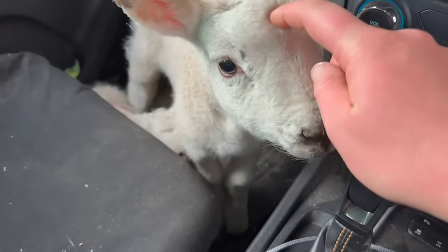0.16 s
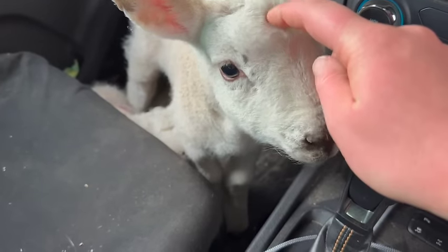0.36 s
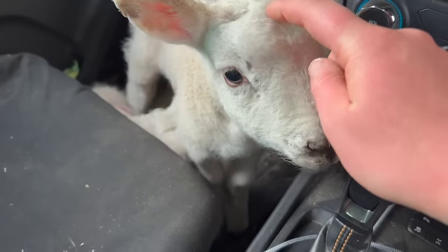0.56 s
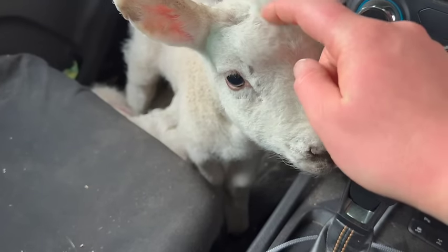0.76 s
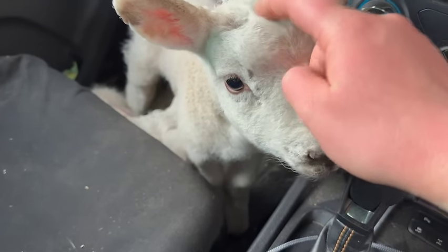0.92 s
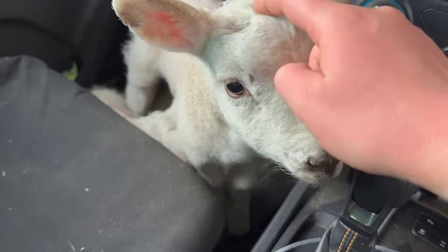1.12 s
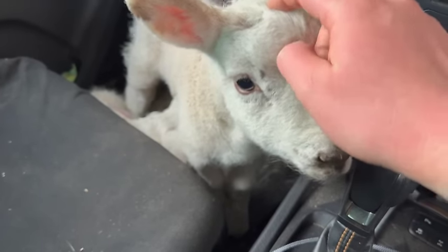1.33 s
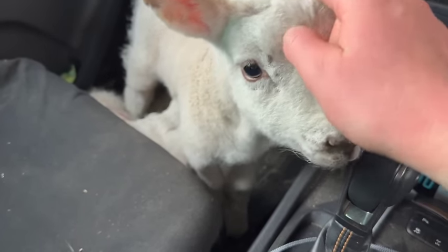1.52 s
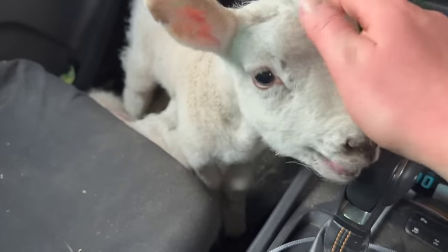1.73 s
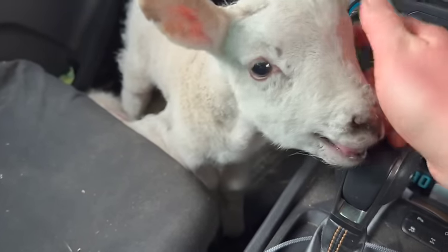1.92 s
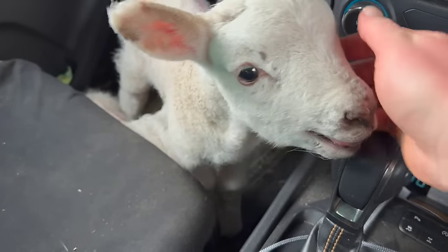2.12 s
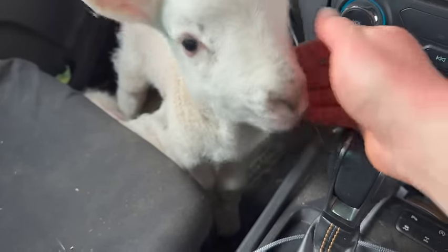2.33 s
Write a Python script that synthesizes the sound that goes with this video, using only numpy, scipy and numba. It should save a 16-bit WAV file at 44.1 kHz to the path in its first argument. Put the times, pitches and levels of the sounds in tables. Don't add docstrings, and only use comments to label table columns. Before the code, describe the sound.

One high lamb bleat dominates the second half, rising quickly, holding, then wavering and fading; before it only soft sniffs, low thumps, faint cab hum and a lip smack, heard close with a short dry echo.

```python
import sys
import numpy as np
from scipy import signal
from scipy.fft import rfft, irfft, next_fast_len
from scipy.io import wavfile
from scipy.ndimage import uniform_filter1d
from numba import njit

SR = 44100
rng = np.random.default_rng(int(sys.argv[2]) if len(sys.argv) > 2 else 0)


def waveform_to_disk(signal):
    frames = np.transpose(np.atleast_2d(signal))
    scaled = np.clip(frames, -1, 1) * 32767
    samples = np.round(scaled).astype(np.int16)
    wavfile.write(sys.argv[1], SR, samples)


def boost(x):
    u = np.asarray(x, float) / 20
    return 10 ** u


N = 104517
T = np.arange(N) / SR
BLEAT_START_S = 1.599


def noise():
    return rng.standard_normal(N)


def level(x, db):
    return x * boost(db) / np.sqrt(np.mean(x ** 2))


def on_log(table, hz):
    a = np.array(table, float)
    return np.interp(np.log(hz + 1), np.log(a[:, 0]), a[:, 1])


@njit
def svf(x, hz, width):
    y, b, l = np.empty(len(x)), 0., 0.
    for i in range(len(x)):
        g, k = np.tan(np.pi * hz[i] / SR), width / hz[i]
        v = (b + g * (x[i] - l)) / (1 + g * (g + k))
        b, l, y[i] = 2 * v - b, l + 2 * g * v, k * v
    return y


def band(x, hz, width):
    return svf(x + 1e-18, hz * np.ones(N), 1. * width)


def steep(x, hz, width):
    return band(band(x, hz, width), hz, width)


def walk(rate_hz):
    k = int(SR / rate_hz)
    held = np.repeat(rng.standard_normal(N // k + 1), k)
    return 1.3 * uniform_filter1d(uniform_filter1d(held, k), k)[:N]


def bump(at_s, length_s):
    return np.exp(-.5 * ((T - at_s) / length_s) ** 2)


def breath():
    # (time [s], level [dB])
    strength = [(0, -61), (.2, -67), (.3, -75), (.4, -89), (.87, -93), (.94, -72.5), (1.1, -84.5),
                (1.27, -71), (1.55, -72)]
    # (centre [Hz], width [Hz], level [dB])
    nose = [(272, 280, 5), (490, 170, -0.5), (1035, 240, 1), (1393, 130, 2), (2450, 340, -2),
            (4960, 990, -8.5), (7360, 980, -7.5), (11000, 5000, -18)]
    dull_after_s, dull_db_per_khz, end_s = 0.47, -0.5, 1.6
    times_s, levels_db = np.array(strength, float).T
    air = noise() * boost(walk(39.6))
    dull_db_per_hz = dull_db_per_khz * (T > dull_after_s) / 1000
    hiss = sum(boost(db + dull_db_per_hz * hz) * steep(air, hz, width * 1.56) for hz, width, db in nose)
    return level(hiss, 0) * boost(np.interp(T, times_s, levels_db)) * (T < end_s)


def cab():
    # (frequency [Hz], density [dB per Hz])
    spectrum = [(15, -42), (25, 0.5), (64, 1.5), (102, -7), (190, -15.5), (229, -12.5), (326, -20.5),
                (911, -31.5), (16000, -54.5)]
    cab_db = -66
    out = 0
    for hz in 30 * 2 ** np.arange(0, 9.1, .5):
        mid = steep(noise(), hz, hz / 2)
        side = steep(noise(), hz, hz / 2)
        spread = min(0.34 + hz / 4500.0, 1)
        stereo = mid + spread * side * np.array([[1], [-1]])
        out = out + boost(on_log(spectrum, hz) + 1.9 * walk(8.8)) * stereo
    return level(out, cab_db)


def shifts():
    # (time [s], length [s], level [dB])
    thumps = [(0.017, 0.068, -58), (0.304, 0.073, -57), (0.82, 0.04, -66.5), (0.976, 0.037, -58.5),
              (1.38, 0.13, -60.5), (1.626, 0.055, -58), (2.173, 0.039, -54.5), (2.233, 0.04, -44.5),
              (2.328, 0.078, -67)]
    floor_hz, width_hz = 59, 55.6
    low = band(band(noise(), floor_hz, width_hz), floor_hz, width_hz * 1.8)
    return level(low, 0) * sum(boost(db) * bump(s, length_s) for s, length_s, db in thumps)


def smacks():
    # (time [s], level [dB], low thump share [1])
    clicks = [
        (1.5134, -45, 0.04),
        (1.5205, -46, .1),
        (1.525, -33, 0.15),
        (1.528, -42, 1.36),
        (1.5328, -43, 0.68),
        (1.5436, -50, 1.35),
    ]
    # (frequency [Hz], level [dB], T60 [s])
    modes = [(342, 5, 0.045), (1100, -6, 0.006), (1490, 6.5, 0.0061), (2240, 2.5, 0.0046),
             (3600, -3, 0.0033), (4870, -5.5, 0.0079), (5870, -9.5, 0.0087)]
    wet_s, wet_length_s, wet_db, fizz_db = 1.541, .009, -58, -60
    hit, thump = np.zeros(N), np.zeros(N)
    for s, db, share in clicks:
        at = int(s * SR)
        hit[at], thump[at] = boost(db), boost(db) * share
    hit += boost(wet_db) * bump(wet_s, wet_length_s) * noise() * (rng.random(N) < .05)
    fizz = boost(fizz_db) * bump(wet_s + .003, wet_length_s) * band(noise(), 9000, 9000)
    t = T[:2000]
    ring = [boost(db) * np.sin(2 * np.pi * hz * t) * 1000. ** (-t / t60_s) for hz, db, t60_s in modes]
    click_ring = signal.fftconvolve(hit, sum(ring[1:]))[:N]
    thump_ring = signal.fftconvolve(thump, ring[0])[:N]
    return fizz + .5 * click_ring + .5 * thump_ring


def gestures():
    # (time [s], level [dB], pitch [Hz], low mouth resonance [Hz], high [Hz], nasal hum [dB])
    syllable = [(1.599, -34, 243.7, 1100, 4330, -48), (1.608, -23, 246.8, 1130, 4250, -48),
                (1.624, -19.5, 258, 1350, 3970, -35.5), (1.646, -13, 262.9, 1545, 4130, -32.5),
                (1.664, -22, 258.5, 1100, 4180, -39)]
    rise = [(1.679, -15.5, 276.6, 1040, 4070, -42), (1.697, -10.5, 292, 1070, 4000, -39),
            (1.712, -11.5, 298.5, 1090, 3860, -43), (1.739, -16, 300.1, 1090, 3910, -48.5),
            (1.761, -15.5, 313.5, 1204, 3870, -47), (1.786, -15, 325.1, 1240, 3600, -48),
            (1.845, -15.5, 322.6, 1216, 3755, -50)]
    note = [(1.882, -16, 331.9, 1334, 3530, -45.5), (1.899, -17.5, 321, 1261, 3702, -53),
            (1.962, -18, 323.1, 1250, 3600, -50), (1.99, -20, 319.8, 1365, 3600, -58),
            (2.009, -16.5, 322.9, 1236, 3695, -48), (2.056, -19.5, 322.8, 1273, 3667, -53.5),
            (2.08, -21.5, 313.6, 1338, 3643, -56), (2.159, -19.5, 318.4, 1328, 3630, -53.5),
            (2.18, -23.5, 302.4, 1375, 3600, -57)]
    waver = [(2.197, -27, 294.4, 1282, 3620, -57), (2.216, -36.5, 254, 1255, 3700, -80),
             (2.25, -28, 301.1, 1304, 3400, -52.5), (2.266, -33, 279.5, 1330, 3600, -56),
             (2.279, -46, 249.1, 1350, 3660, -72), (2.297, -51.5, 245.4, 1292, 3920, -57),
             (2.312, -38, 262.5, 1140, 3600, -59), (2.334, -35.5, 291.2, 1141, 3420, -48.5),
             (2.37, -42.5, 245.6, 1070, 3480, -53.5)]
    # (time [s], length [s], pitch drop share [1], mouth jump [Hz])
    catches = [(1.67, 0.009, 0.0034, 50), (1.777, 0.0069, 0.0043, 53.5), (1.896, 0.0056, 0.0078, 96),
               (1.984, 0.0063, 0.0075, -150), (2.072, .007, 0.0083, -100), (2.203, 0.0072, 0.0054, 46)]
    clear_db, rough_per_db, catch_rough = -23, .025, .22
    attack_rough, attack_s = .36, .09
    rows = np.array(syllable + rise + note + waver, float)
    db, pitch_hz, low_hz, high_hz, hum_db = (
        uniform_filter1d(np.interp(T, rows[:, 0], column), 260) for column in rows.T[1:])
    catch = [bump(s, length_s) for s, length_s, _, _ in catches]
    pitch_hz = pitch_hz * (1 - sum(c * row[2] for c, row in zip(catch, catches)))
    high_hz = high_hz + sum(c * row[3] for c, row in zip(catch, catches))
    weak_db = np.clip(clear_db - db, 0, 30)
    rough = .045 + catch_rough * sum(catch) + rough_per_db * weak_db
    rough = rough + attack_rough * np.exp(-np.abs(T - BLEAT_START_S) / attack_s)
    return db, pitch_hz, low_hz, high_hz, hum_db, rough


def larynx(db, pitch_hz, rough):
    tremble_hz, tremble_share, tremble_db, tremble_start_s = 21.66, 0.0036, 1, 1.8
    jitter_share, shimmer_db = .0011, .2
    air_db, treble_air, air_low_hz = 5, .12, 1800
    leak_db, leak_s, leak_length_s, leak_hz = -39, 2.29, 0.055, 5000
    on = T >= BLEAT_START_S
    shake = np.sin(2 * np.pi * tremble_hz * (T - tremble_start_s))
    jitter = jitter_share * (1 + 20 * rough) * walk(280)
    hz = pitch_hz * (1 + tremble_share * shake + jitter)
    cycle = np.cumsum(hz) / SR
    pulses = np.zeros(N)
    for k in range(1, 68):
        pulses[on] += np.cos(2 * np.pi * k * cycle[on]) * (k * hz[on] < .4 * SR)
    pulses /= np.sqrt(30)
    hiss = band(band(noise(), 7500, 11000), 7500, 12000)
    air = rough * boost(air_db) * 2 * np.exp(-(cycle % 1) / .3) * hiss
    air += treble_air * 2 * np.exp(-(cycle % 1) / .5) * steep(noise(), 12500, 7000) * 4
    high_air = signal.sosfilt(signal.butter(2, air_low_hz, "high", fs=SR, output="sos"), air)
    air = high_air + np.clip(2 * rough, 0, 1) * band(air, 900, 1700)
    shimmer = shimmer_db * (1 + 10 * rough) * walk(280)
    drive = (pulses + air) * on * boost(db + tremble_db * shake + shimmer)
    drive += boost(leak_db) * bump(leak_s, leak_length_s) * band(noise(), leak_hz, 4000)
    return drive - band(drive, hz, 300), cycle


def throat_and_mouth(drive, db, low_hz, high_hz):
    # (centre [Hz], width [Hz], level [dB], gain per mouth opening [dB/kHz], loss per weakness [dB/dB])
    throat = [(811, 160, -10, -4.5, 1.54), (1530, 580, -37.5, -11, -.4), (4757, 480, -15, 10, -0.27),
              (5925, 496, -19.5, 7.5, 0.04), (6550, 980, -29, 20, 1), (8550, 1700, -33.5, 34, -0.69),
              (9660, 1300, -16.5, -1, 0.6), (11320, 810, -19.5, -13, 0.5), (14330, 1900, -28.5, 9, -0.1)]
    # (time [s], centre [Hz], level [dB])
    middle = [(1.6, 3060, 0), (1.66, 3050, -1.5), (1.72, 3050, 2.5), (1.78, 2690, -3), (1.9, 2626, -3),
              (2.0, 2730, -3.5), (2.16, 2790, -1), (2.26, 2820, -3), (2.29, 2850, -15)]
    # (centre [Hz], width [Hz], swallowed share [1])
    pockets = [(3220, 81, 0.44), (4210, 180, 0.77), (5610, 200, 0.71), (12700, 610, .6)]
    low_width_hz, low_db, low_open_db, low_weak_db = 203, -2.5, -7.5, -0.2548
    high_width_hz, high_db = 392, 2
    middle_width_hz, middle_db = 610, -8
    twin_up_hz, twin_db, twin_s, twin_length_s = 490, -1, 1.645, 0.036
    rest_hz, follow_share, full_db = 3600, 0.65, -13
    wander_db = 2.2
    opening_khz = (high_hz - rest_hz) / 1000
    tired_db = np.clip(full_db - db, 0, 30)
    follow_hz = follow_share * (high_hz - rest_hz)
    low_gain = boost(low_db + low_open_db * opening_khz - low_weak_db * tired_db)
    out = low_gain * band(drive, low_hz, low_width_hz)
    high_gain = boost(high_db + 0.2 * wander_db * walk(45.19))
    out -= high_gain * steep(drive, high_hz, high_width_hz * 1.26)
    for hz, width, base_db, open_db, weak_db in throat:
        at_hz = hz + (hz > 2000) * follow_hz
        gain_db = base_db + open_db * opening_khz - weak_db * tired_db
        out += boost(gain_db + wander_db * walk(35.92)) * steep(drive, at_hz, width * 1.25)
    out += boost(twin_db) * bump(twin_s, twin_length_s) * steep(drive, high_hz + twin_up_hz, 600)
    times_s, centres_hz, levels_db = np.array(middle, float).T
    at_hz = np.interp(T, times_s, centres_hz)
    gain_db = middle_db + np.interp(T, times_s, levels_db) + .5 * wander_db * walk(40.14)
    out += boost(gain_db) * steep(drive, at_hz, middle_width_hz)
    for hz, width, share in pockets:
        swallowed = np.clip(share * (1 + 0.13 * walk(24.3)), 0, 1)
        out = out - swallowed * band(out, hz + follow_hz, width)
    return out


def bleat():
    hum_orders_db = [-0.3, -2, -45]
    chest_hz, chest_db = 152, -65.5
    db, pitch_hz, low_hz, high_hz, hum_db, rough = gestures()
    on = T >= BLEAT_START_S
    drive, cycle = larynx(db, pitch_hz, rough)
    voice = throat_and_mouth(drive, db, low_hz, high_hz)
    chest = level(band(band(noise(), chest_hz, 68), chest_hz, 69), chest_db) * boost(db / 2) * on
    hum = sum(boost(d) * np.sin(2 * np.pi * (k + 1) * cycle) for k, d in enumerate(hum_orders_db))
    return voice * boost(14.5) + chest + np.sqrt(2) * boost(hum_db) * hum * on


def ports(lamb):
    # (frequency [Hz], phase difference [rad])
    port_phase = [(150, -.2), (340, -.2),
                  (480, -0.8), (690, 1.62), (1030, 0.14), (3270, 1.0), (6600, -0.28), (7500, 3.5),
                   (8400, 3.5), (13500, 1.5)]
    # (frequency [Hz], left - right [dB])
    balance = [(200, 1.5), (380, -1), (700, 5), (1290, -1), (2600, -2), (4400, -2), (15000, 0.2)]
    size = next_fast_len(N + 4096)
    hz = np.arange(size // 2 + 1) * SR / size
    half = np.exp(.5j * on_log(port_phase, hz)) * boost(on_log(balance, hz) / 2)
    return irfft(rfft(lamb, size) * np.array([half, 1 / half]), size)[:, :N]


def cab_echo(lamb):
    t60_s, echo_db = .035, -19
    glass_hz, glass_db, glass_t60_s = 11100, -2, 0.047
    t = T[:4000]
    tail = rng.standard_normal((2, len(t))) * 1000. ** (-t / t60_s) * (t > .0015)
    tail *= boost(echo_db) / np.sqrt((tail ** 2).sum(axis=1, keepdims=True))
    sos = signal.butter(2, [glass_hz * 0.56, glass_hz * 1.8], "band", fs=SR, output="sos")
    glass = signal.sosfilt(sos, rng.standard_normal((2, len(t))))
    tail += boost(glass_db) * glass * 1000. ** (-t / glass_t60_s) / np.sqrt(glass_t60_s * SR / 14)
    return signal.fftconvolve(lamb[None], tail, axes=1)[:, :N]


def scene():
    duck_db, duck_start_s, duck_end_s = -7, 1.7, 2.3
    lamb = breath() + smacks() + bleat()
    duck = boost(duck_db * uniform_filter1d(1. * (T > duck_start_s) * (T < duck_end_s), 3000))
    thumps = shifts() * np.array([[1.04], [.96]]) + 0.3 * shifts() * np.array([[1], [-1]])
    return ports(lamb) + cab_echo(lamb) + duck * cab() + thumps


def roll_off(x):
    return signal.sosfilt(signal.butter(12, 16570, fs=SR, output="sos"), x)


def record(dry):
    notch_hz, notch_width_hz, side_top_hz = 8150, 2200, 12800
    hiss_db, headroom, low_cut_hz, top_hz = -89, .95, 42, 15650
    mid, side = (dry[0] + dry[1]) / 2, (dry[0] - dry[1]) / 2
    for _ in range(2):
        mid = mid - 0.53 * band(mid, notch_hz, notch_width_hz)
    side = signal.sosfilt(signal.butter(4, side_top_hz, fs=SR, output="sos"), side)
    hiss = boost(hiss_db) * signal.lfilter([1, -.5], 1, rng.standard_normal((2, N)))
    wet = np.array([mid + side, mid - side]) + hiss
    low_cut = signal.butter(3, low_cut_hz, "high", fs=SR, output="sos")
    top_cut = signal.ellip(8, .3, 60, top_hz, fs=SR, output="sos")
    mix = signal.sosfilt(np.vstack([low_cut, top_cut]), headroom * np.tanh(wet / headroom))
    return roll_off(mix)


dry = scene()
out = record(dry)
waveform_to_disk(out)
```